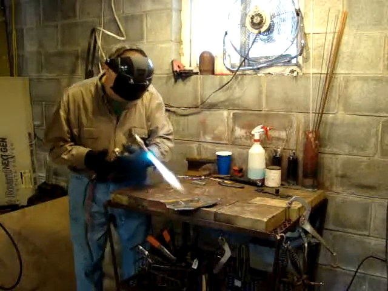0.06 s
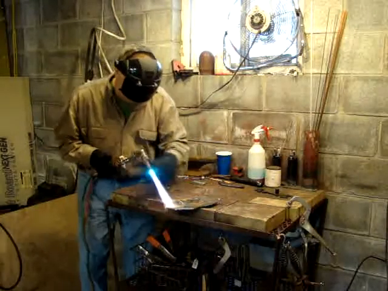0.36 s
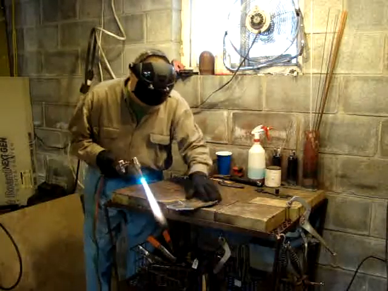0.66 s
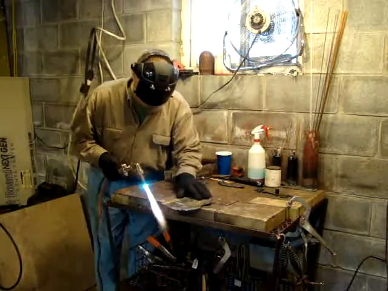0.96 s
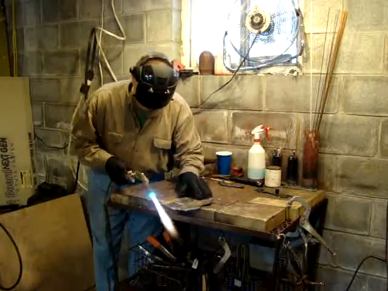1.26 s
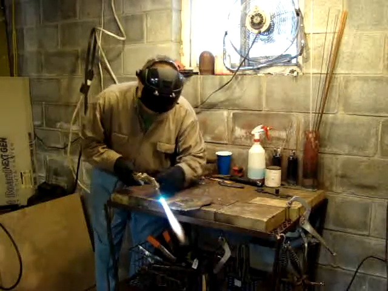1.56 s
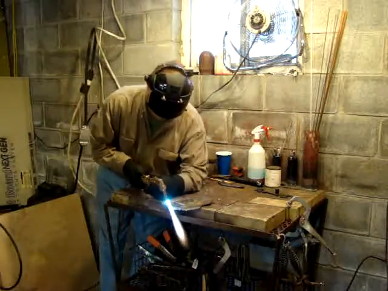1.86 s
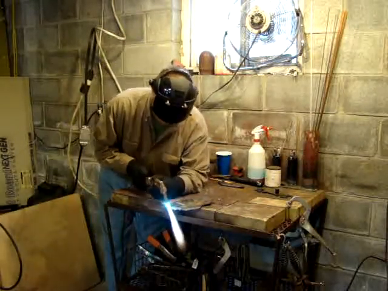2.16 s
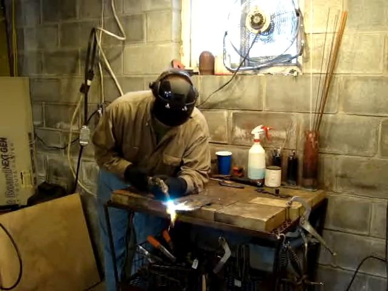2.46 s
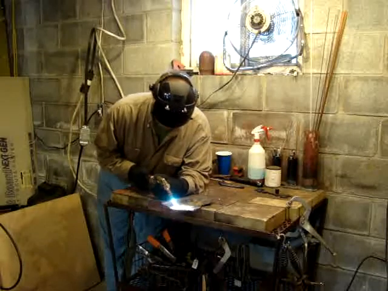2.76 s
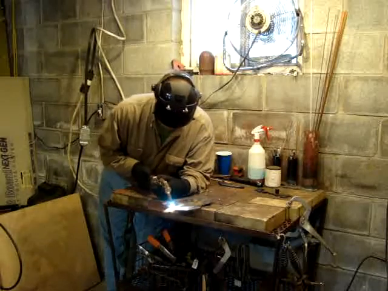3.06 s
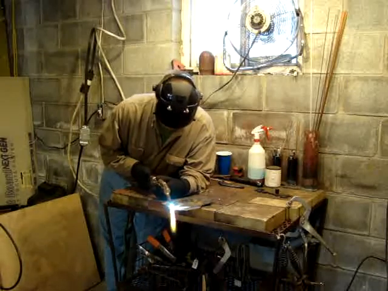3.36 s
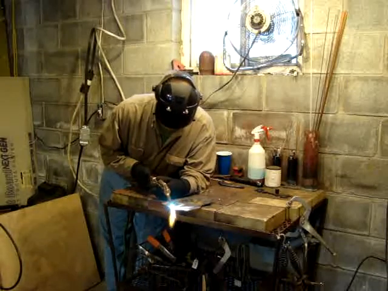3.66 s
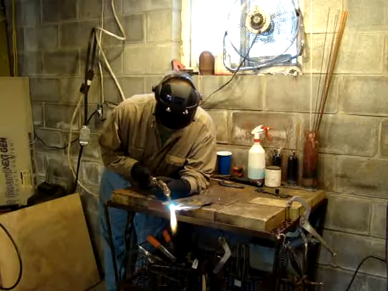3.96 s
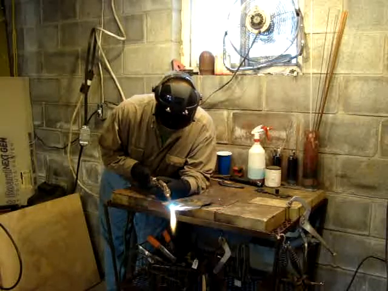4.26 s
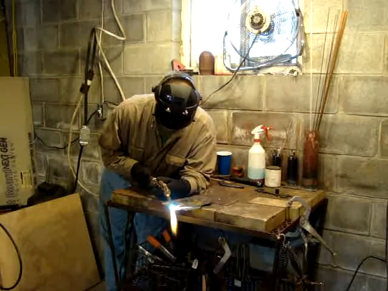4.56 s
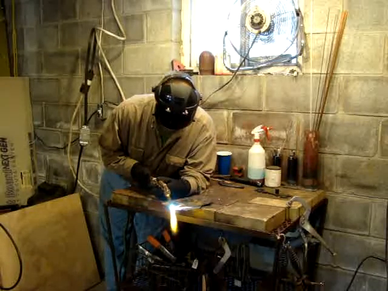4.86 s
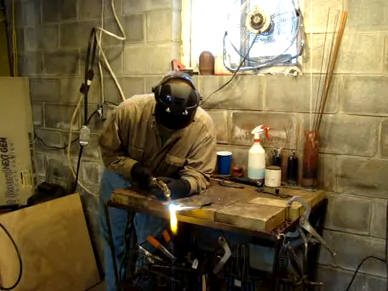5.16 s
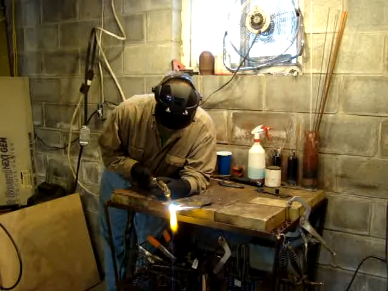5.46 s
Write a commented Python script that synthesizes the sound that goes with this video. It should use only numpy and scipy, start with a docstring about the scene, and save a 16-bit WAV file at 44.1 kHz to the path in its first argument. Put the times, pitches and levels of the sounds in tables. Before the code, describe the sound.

A gas cutting torch burns a few metres away in a small block-walled workshop, its steady hiss joined by a rasping roar and a faint hollow howl. A steel plate scrapes and squeaks briefly along the bench. About halfway through, the roar drops out, comes back for a moment with a tearing sound, then continues thinner, with sizzling bursts of gas spraying off the metal.

```python
"""A small block-walled workshop, an oxy-fuel cutting torch burning a few metres away.
The gas jet hisses steadily from the nozzle while the turbulent flame roars, rasps and faintly howls.
The flame washes over a steel plate, which sticks and slips in squeaks as it is pushed along the bench.
Then the tip settles on the plate's edge: gas sprays off it and the roar breaks off, returns and thins."""
import sys
import numpy as np
from scipy import signal
from scipy.fft import rfft, irfft
from scipy.io import wavfile

SR = 44100
rng = np.random.default_rng(int(sys.argv[2]) if len(sys.argv) > 2 else 0)


def dump_mix(stems):
    """Bounce the given channels to the path in sys.argv[1] as a 16-bit WAV at rate SR."""
    frames = np.atleast_2d(stems).T  # one column per channel
    limited = np.clip(frames, -1, 1)  # hard clip at full scale
    pcm = np.round(limited * 32767).astype(np.int16)
    wavfile.write(sys.argv[1], SR, pcm)


N = 252252
TIME = np.arange(N) / SR
FREQ = np.maximum(np.arange(N // 2 + 1) * SR / N, 1)

# peaks and hollows that bench and walls give a flame at the bench's edge: f/Hz, width/Hz, gain/dB
BENCH_PEAKS = [(158, 10, 7.5), (316, 61, 1.5), (379, 17, -8), (504, 48, 4.5), (588, 48, -2.5),
               (625, 76, 7.5), (696, 25, -5), (760, 69, 6), (845, 31, -5.5), (910, 40, 5), (988, 30, -7),
               (1007, 73, 5.5), (1278, 31, -6.5), (1323, 59, 6), (1630, 23, -3), (1720, 38, 2.5),
               (1675, 45, 1), (1946, 24, 9), (2120, 150, -2.5), (2186, 130, 4), (2347, 64, -3.5),
               (2410, 29, 1.5), (2880, 55, 2), (3430, 150, 0.5), (5040, 210, 3.5), (5870, 65, 5),
               (6770, 250, 2)]
# spectrum of the flame's fine eddies: f/Hz, level/dB
RASP_SPECTRUM = [(100, -43), (300, -31), (1000, -18.5), (1800, -4), (2500, 1), (3000, -3), (3800, -4.5),
                 (5000, -11), (10000, -32.5)]


def undb(db):
    """Decibels to gain."""
    return 10 ** (np.asarray(db) / 20)


def unit(x):
    """Scale to a spread of 1."""
    return x / np.std(x)


def wander(rate_hz):
    """Smooth random drift, mostly slower than rate_hz, with a spread of 1."""
    return unit(irfft(rfft(rng.standard_normal(N)) / (1 + (FREQ / rate_hz) ** 4), N))


def ripple(peaks):
    """EQ curve in dB from a set of bell-shaped peaks and hollows."""
    return sum(db * np.exp2(-(2 * (FREQ - hz) / width) ** 2) for hz, width, db in peaks)


def swell(start, attack, hold, release):
    """Rounded envelope from 0 to 1 and back; times in seconds."""
    end = start + attack + hold + release
    ramp = np.clip(np.minimum((TIME - start) / attack, (end - TIME) / release), 0, 1)
    return np.sin(np.pi / 2 * ramp) ** 2


def gusts(rows):
    """Envelope of gusts that each rise for a quarter of their length, hold for half and fall."""
    return sum(undb(db) * swell(start, length / 4, length / 2, length / 4) for start, length, db in rows)


def turbulence(spectrum, eq_db=0, flutter_db=0, flutter_hz=40):
    """Eddy noise with optional flutter, coloured by its source's spectrum and the EQ of its place."""
    hz, db = np.transpose(spectrum)
    colour_db = np.interp(np.log(FREQ), np.log(hz), db) + eq_db
    eddies = rng.standard_normal(N) * undb(flutter_db * wander(flutter_hz))
    return unit(irfft(rfft(eddies) * undb(colour_db), N))


def resonance(hz, half_width_hz):
    """A resonance driven by turbulence: a tone whose strength and phase wander."""
    phase = 2 * np.pi * np.cumsum(hz * np.ones(N)) / SR
    return unit(wander(half_width_hz) * np.cos(phase) + wander(half_width_hz) * np.sin(phase))


def workshop(x, wet_db, t60_s=0.33):
    """Direct sound plus the short, dense echo of block walls; the bass stays mostly dry."""
    t = TIME[:SR // 2]
    tail = rng.standard_normal(len(t)) * undb(-60 * t / t60_s) * (t > .004)
    tail = signal.sosfilt(signal.butter(1, 900, "high", fs=SR, output="sos"), tail)
    echo = signal.fftconvolve(x, tail / np.linalg.norm(tail))[:N]
    return (x + undb(wet_db) * echo) / np.sqrt(1 + undb(wet_db) ** 2)


def rumble(drive_db):
    """A faint, uneven low rumble lies under the flame and eases off as it thins."""
    # spectrum of the rumble: f/Hz, level/dB
    spectrum = [(20, -13), (60, -1.5), (90, -3), (130, -7.5), (250, -28), (1000, -45.5)]
    return turbulence(spectrum, flutter_db=6, flutter_hz=10) * undb(-64.5 + 0.46 * drive_db)


def plate_push():
    """The plate scrapes along the bench; each stick and slip sets one mode squeaking, a little unsteady."""
    # spectrum of the scrape: f/Hz, level/dB
    spectrum = [(300, -45), (1800, 2), (2700, -6), (3900, -6), (5200, -4), (7000, -14.5), (10000, -25)]
    # modes of the steel plate: f/Hz, width/Hz, gain/dB
    modes = [(2660, 80, 13), (3100, 91, 15), (3520, 70, 9), (3650, 70, 6), (3987, 72, 17), (4580, 77, 6),
             (5545, 63, 3), (6300, 70, 13)]
    # squeaks, one per slip: t/s, length/s, mode number from 0, level/dB
    squeaks = [(.886, .044, 3, -26), (.914, .066, 0, -28), (.951, .024, 7, -21.5), (.967, .03, 6, -23.5),
               (.983, .022, 7, -24.5), (.997, .018, 5, -26), (1.0, .07, 6, -31)]
    push = undb(-24) * swell(start=.82, attack=.08, hold=.12, release=.1)
    steel = turbulence(spectrum, ripple(modes), flutter_db=3, flutter_hz=60) * push
    wavering_time = np.cumsum(1 + 0.0012 * wander(120)) / SR
    for start, length, mode, db in squeaks:
        progress = np.clip((TIME - start) / length, 0, 1)
        slip = np.sqrt(np.abs(np.sin(np.pi * progress)))
        tone = np.sqrt(2) * np.sin(2 * np.pi * modes[mode][0] * wavering_time)
        steel += undb(db) * slip * tone
    return steel


def gap_howl(drive_db):
    """The gap between flame and bench howls hollowly, rising in pitch as the tip comes closer."""
    # path of the gap's resonance: t/s, f/Hz, level/dB at full flame
    path = [(0, 915, -46), (.45, 976, -23.5), (1.249, 1003, -26.5), (1.75, 1051, -42), (2.25, 1074, -29.5),
            (2.6, 1123, -38), (5.72, 1031, -30.5)]
    times, hz, db = np.transpose(path)
    howl = resonance(np.interp(TIME, times, hz), half_width_hz=44)
    return howl * undb(np.interp(TIME, times, db) + drive_db)


def tip_song(drive_db, on_plate):
    """The tip sings faintly, about an octave above the howl; the plate stifles it."""
    level_db = -33.5 + 0.62 * drive_db - 3.5 * on_plate + 4.5 * wander(1.7)
    return resonance(hz=1987, half_width_hz=29) * undb(level_db)


def plate_wash(drive_db, on_plate):
    """The flame rushes hollowly across the plate's face, with a whoosh as the tip swings closest."""
    # spectrum of the rush: f/Hz, level/dB
    spectrum = [(90, -45), (150, -23.5), (300, -3.5), (450, 1.5), (950, -9.5), (1500, -5), (2300, -7),
                (3000, -15.5), (8000, -21)]
    # peaks and hollows of a flame above the plate: f/Hz, width/Hz, gain/dB
    peaks = [(364, 72, -36), (455, 82, 1.5), (613, 70, -26), (749, 40, 12.5), (845, 34, -6.5), (954, 83, 9),
             (1107, 42, 4), (1213, 53, 11.5), (1380, 56, -13), (1470, 99, 6.5), (1700, 86, 7.5),
             (1740, 70, -6), (2450, 90, 4)]
    wash = turbulence(spectrum, ripple(peaks)) * on_plate * undb(-19.5 + drive_db)
    swing = swell(start=.1, attack=.34, hold=.13, release=.45)
    whoosh = resonance(hz=1356, half_width_hz=440) * swing * undb(-28)
    return wash + whoosh


def flame_flares():
    """The flame flares raspily as it catches the steel."""
    # flares: t/s, length/s, level/dB
    flares = [(1.48, .26, -28), (3.38, 0.15, -25.5), (3.73, .12, -27.5), (4.6, .6, -27)]
    return turbulence(RASP_SPECTRUM, ripple(BENCH_PEAKS), flutter_db=2.5, flutter_hz=110) * gusts(flares)


def edge_splits():
    """The plate's edge splits the flame with a bright tearing sound."""
    # spectrum of the tearing: f/Hz, level/dB
    spectrum = [(100, -46), (500, -12), (2000, 0), (3800, 1), (5200, -2), (7000, -11), (10000, -26)]
    # splits: t/s, length/s, level/dB
    splits = [(2.985, 0.069, -25), (3.12, 0.18, -24)]
    return turbulence(spectrum) * gusts(splits)


def gas_spray():
    """Gas sprays off the plate in sizzling bursts when the tip dips close."""
    # spectrum of the spray: f/Hz, level/dB
    spectrum = [(500, -50), (4000, -16), (6500, -4), (8800, -1), (10000, -12)]
    # resonance of the gap under the tip: f/Hz, width/Hz, gain/dB
    ring = [(6770, 260, 8.5)]
    # bursts of spray: t/s, length/s, level/dB
    bursts = [(2.63, 0.17, -27), (3.1, 0.84, -27), (4.25, 0.68, -29.5), (5.0, .65, -30.5)]
    return turbulence(spectrum, ripple(ring), flutter_db=1, flutter_hz=80) * gusts(bursts)


def nozzle_hiss():
    """The steady gas jet hisses; its bounce off the bench combs the hiss and shifts as the hand drifts."""
    # spectrum of the jet: f/Hz, level/dB
    spectrum = [(30, -25), (110, -33), (160, -17.5), (250, -3.5), (500, -3.5), (1500, 0.5), (3000, -2),
                (4400, 2), (5100, 4.5), (5600, 6.5), (6700, 6), (7600, 5.5), (8800, 5.5), (9700, 8.5),
                (11000, -22)]
    jet = turbulence(spectrum, 0.68 * ripple(BENCH_PEAKS), flutter_db=0.78, flutter_hz=25)
    lag_s = .0013 + .00005 * wander(3.9)
    bounce = np.interp(TIME - lag_s, TIME, jet)
    return (jet + 0.32 * bounce) * undb(-23.5)


def flame(drive_db, on_plate):
    """Large eddies roar over a deep body and fine ones rasp; all flicker together as the flame wavers."""
    # spectrum of the roar: f/Hz, level/dB
    roar_spectrum = [(40, -46), (110, -47), (150, -23), (185, -26), (225, -14.5), (300, -3.5), (450, -3.5),
                     (700, -0.5), (1050, -0.5), (1400, -5.5), (2000, -6), (3000, -12), (5000, -28),
                     (10000, -53)]
    # spectrum of the deep body: f/Hz, level/dB
    body_spectrum = [(40, -33), (110, -41), (150, -23.5), (185, -18), (230, 0), (310, 2), (450, 2),
                     (700, -12), (2000, -53)]
    bench_db = ripple(BENCH_PEAKS)
    roar = turbulence(roar_spectrum, bench_db, flutter_db=0.3, flutter_hz=70)
    body = turbulence(body_spectrum, bench_db, flutter_db=0.5, flutter_hz=40)
    rasp = turbulence(RASP_SPECTRUM, bench_db, flutter_db=0.5, flutter_hz=110)
    shield_db = -3 * on_plate  # the plate damps the free flame, its body twice over
    # the body grows faster than the roar and the rasp more slowly, so a weak flame sounds thin
    roar *= undb(-19.5 + drive_db)
    body *= undb(-27 + 2.13 * drive_db + shield_db)
    rasp *= undb(-23 + 0.48 * drive_db)
    flicker_db = 0.69 * wander(25)
    return (body + roar + rasp) * undb(shield_db + flicker_db)


def scene():
    """Torch and plate in the workshop, the same in both channels."""
    # strength of the flame's turbulence: t/s, level/dB
    strength = [(0.0, -23), (0.3, -20.5), (0.8, -22), (1.03, -23), (1.5, -21.5), (2.65, -21.5),
                (2.71, -36.0), (2.985, -30), (3.005, -21), (3.17, -21.0), (3.24, -32.0), (3.33, -32),
                (3.44, -24.5), (3.9, -32.5), (4.08, -26), (4.45, -28), (4.75, -26.0), (5.72, -26.5)]
    full_flame_db = -21.5
    drive_db = np.interp(TIME, *np.transpose(strength)) - full_flame_db
    # the flame swings onto the plate's face and slides off again
    on_plate = swell(start=-.62, attack=.76, hold=.59, release=.75)
    gas = flame(drive_db, on_plate) + plate_wash(drive_db, on_plate)
    gas += flame_flares() + edge_splits() + gas_spray() + nozzle_hiss()
    torch = workshop(gas, wet_db=-6.5) + gap_howl(drive_db) + tip_song(drive_db, on_plate)
    mono = torch + workshop(plate_push(), wet_db=-19) + rumble(drive_db)
    return np.array([mono, mono])


def record(dry, top_hz=10120):
    """A steep low-pass takes the air off the top."""
    return signal.sosfilt(signal.ellip(14, .1, 80, top_hz, fs=SR, output="sos"), dry)


dry = scene()
out = record(dry)
dump_mix(out)
```